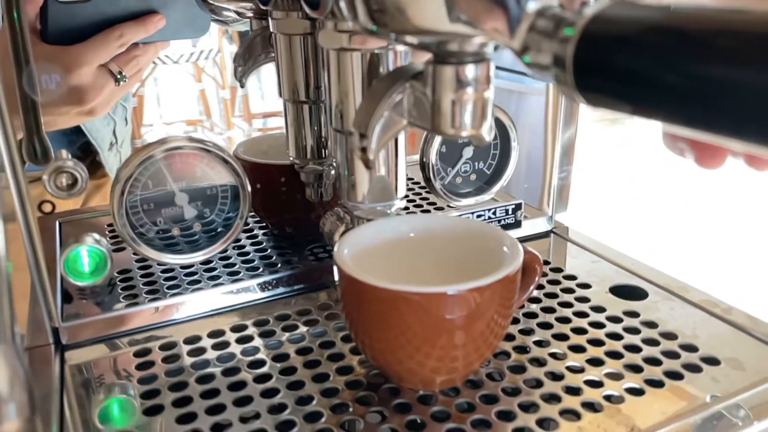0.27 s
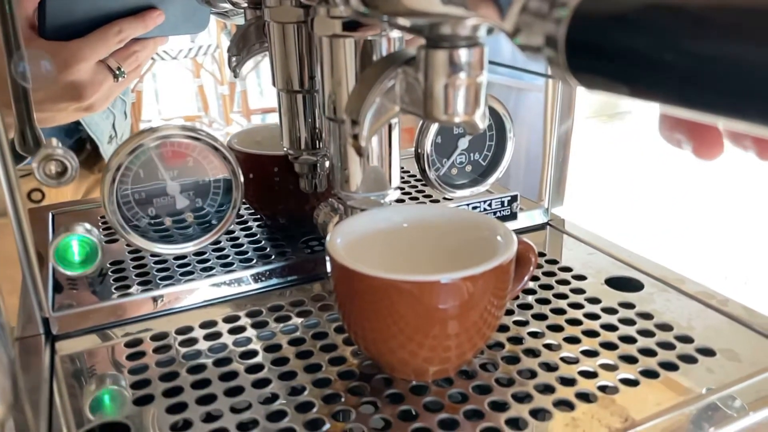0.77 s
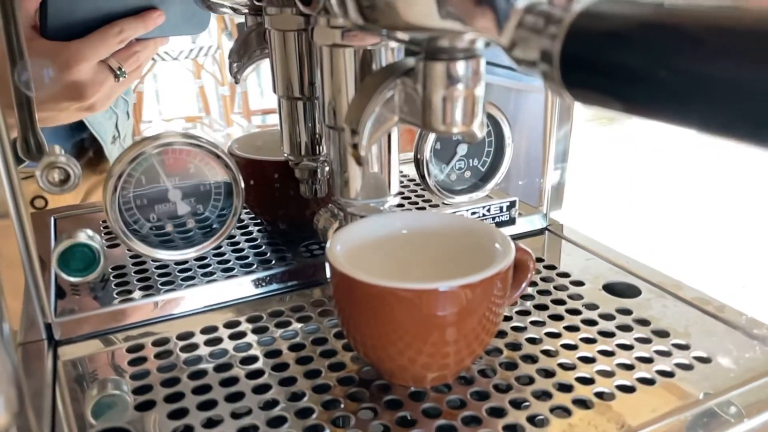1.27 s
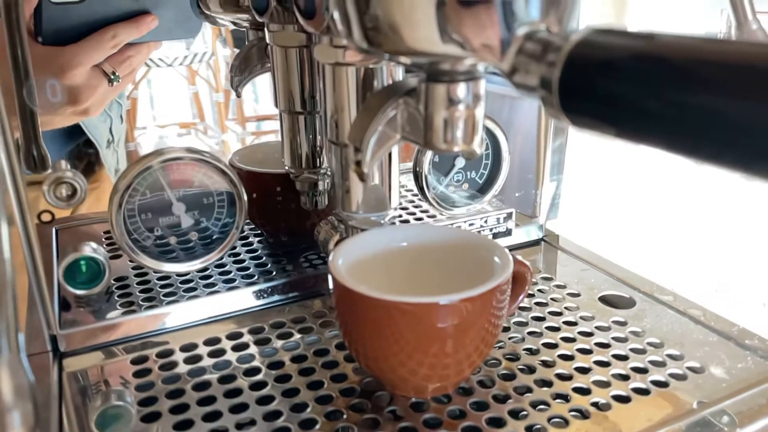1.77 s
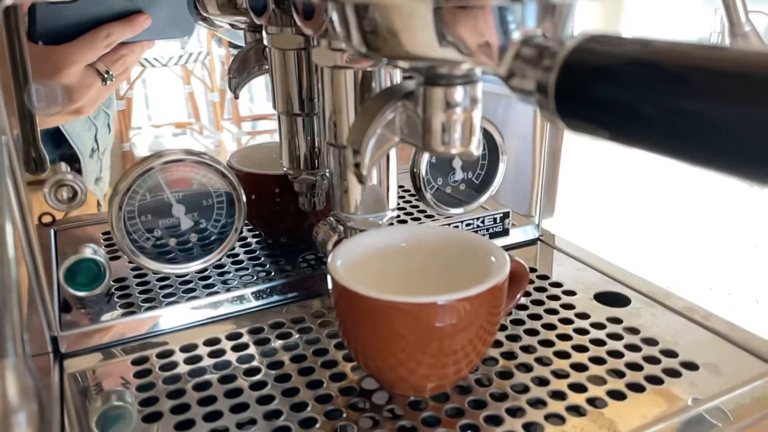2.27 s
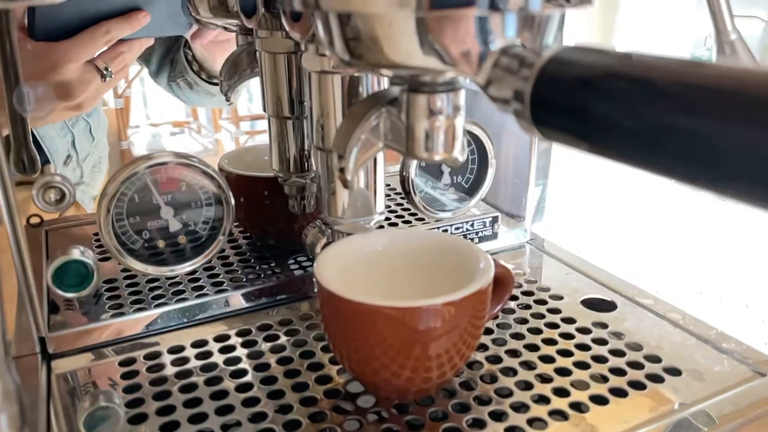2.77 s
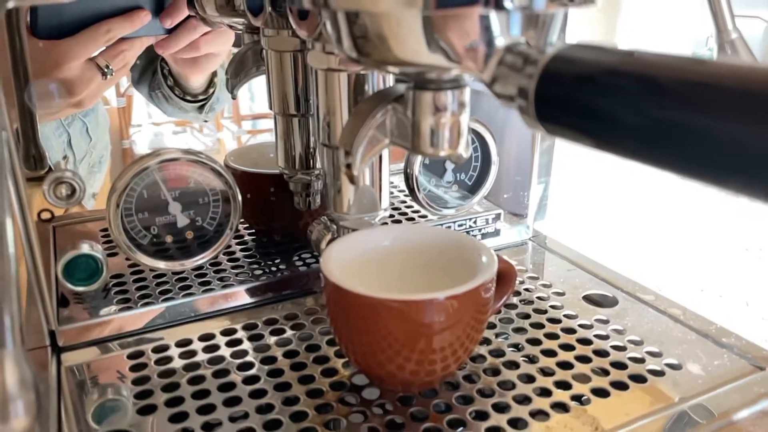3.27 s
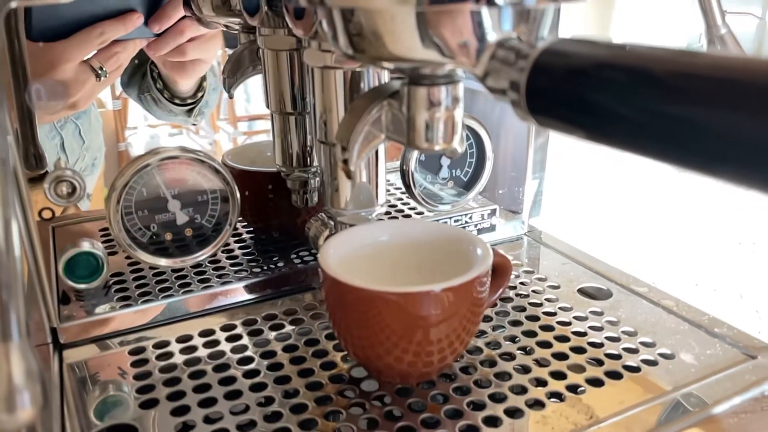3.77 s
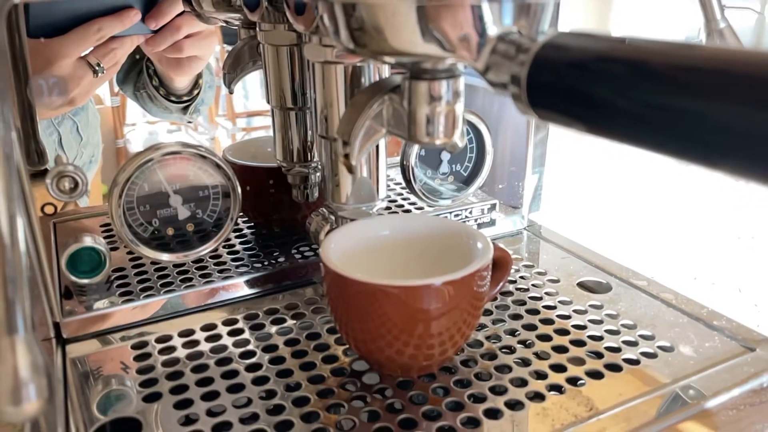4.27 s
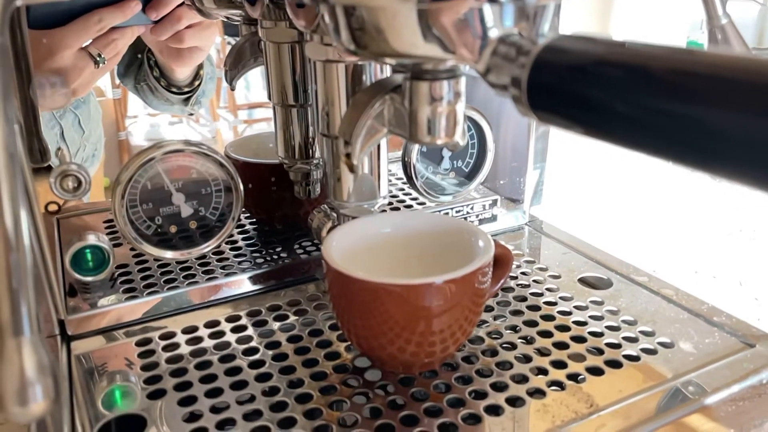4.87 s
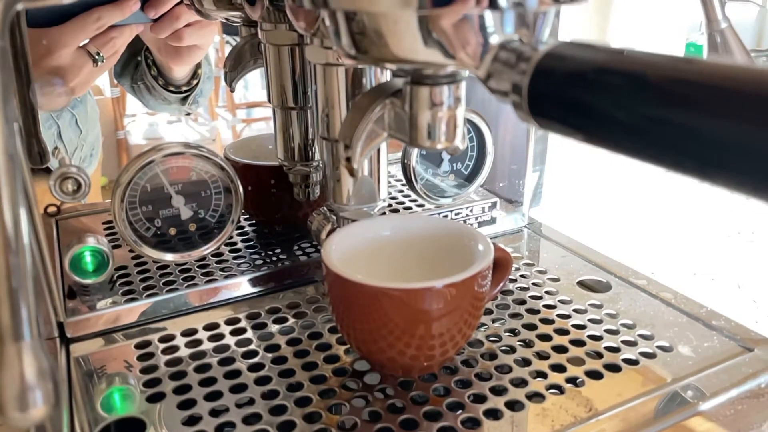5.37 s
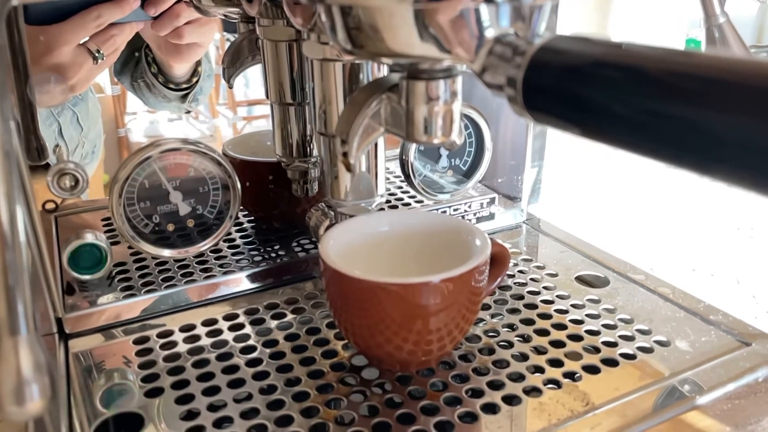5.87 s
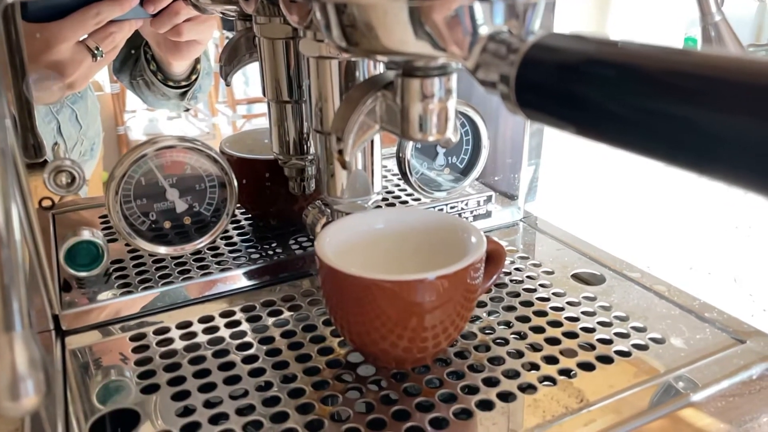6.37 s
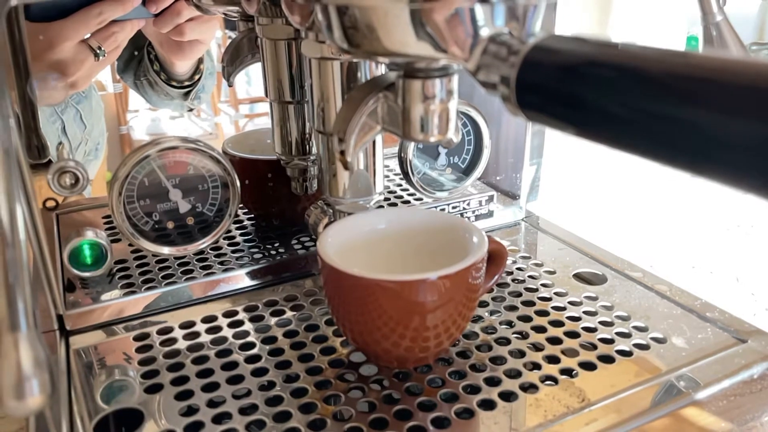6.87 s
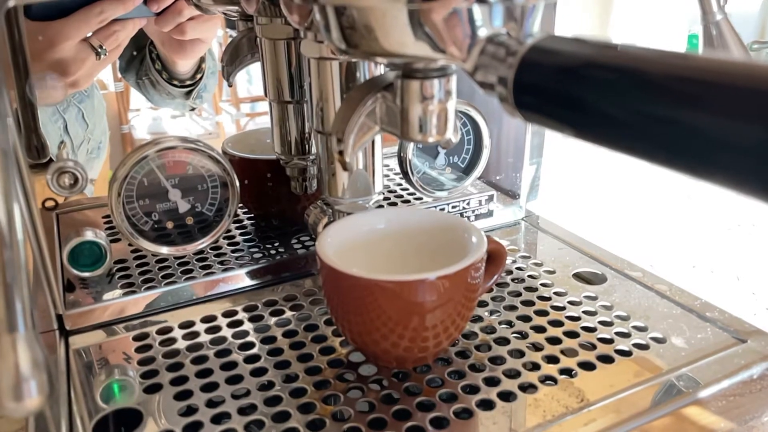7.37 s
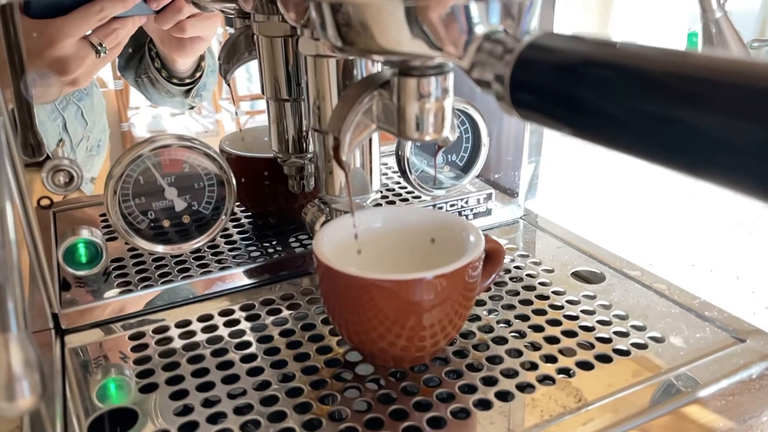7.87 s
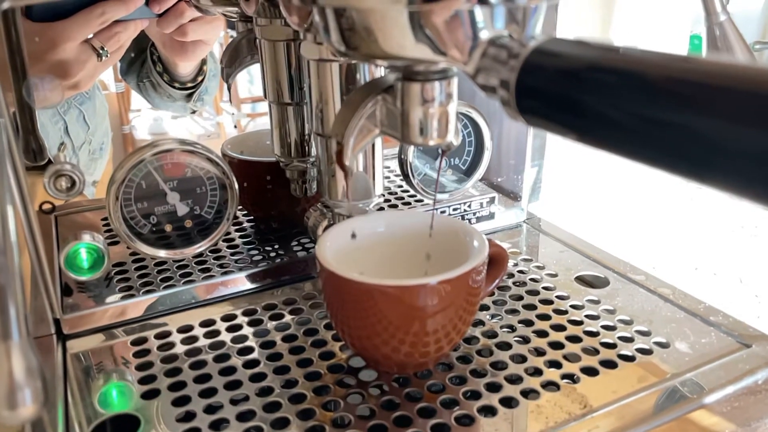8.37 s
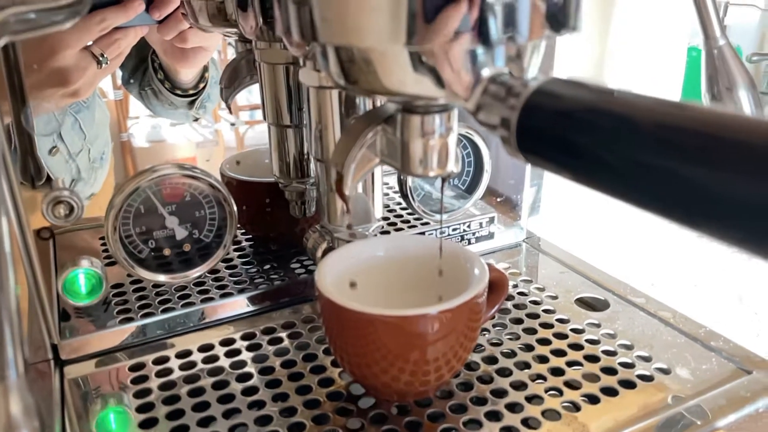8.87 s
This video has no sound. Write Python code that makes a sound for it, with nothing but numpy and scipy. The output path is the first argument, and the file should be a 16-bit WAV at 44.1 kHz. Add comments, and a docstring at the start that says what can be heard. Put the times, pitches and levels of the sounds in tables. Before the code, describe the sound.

Close stereo in a small kitchen: faint low drone and a thin simmer, then a soft lever scuff and dry metallic snap. A motor starts with a burst of gurgling, sputtering water and air, then settles to a steady mains hum with whine and soft flow hiss. A fluttering panel rattle stops late, followed by quiet hooting pulses and two tiny drops in a cup.

```python
"""An espresso machine in a kitchen: over room air and drones, a simmer sinks, the lever scuffs and trips its switch.
Contacts snap, a motor spins up and the valve opens; water and air churn through the pump as shaped noise and bubbles.
Then harmonic lines of mains hum and shaft whine settle over pulsing flow noise, and the casing flutters and rattles.
As pressure is reached the motor sags a little and the flutter stops; the bypass valve hoots and two drops of coffee
land in the cup."""
import sys
import numpy as np
from scipy import signal
from scipy.fft import rfft, irfft, next_fast_len
from scipy.io import wavfile
from scipy.ndimage import map_coordinates

SR = 44100
rng = np.random.default_rng(int(sys.argv[2]) if len(sys.argv) > 2 else 0)


def unload_audio(sound):
    """Save the sound as a 16-bit wav file, at the path given as the first command line argument."""
    columns = np.transpose(np.atleast_2d(sound))
    # keep every value between -1 and 1, then stretch to whole-number steps
    steps = np.round(np.clip(columns, -1, 1) * 32767)
    wavfile.write(sys.argv[1], SR, steps.astype(np.int16))


N = 402191
T = np.arange(N) / SR  # seconds

MAINS_HZ = 120.035  # magnetic hum
TOP_HZ = 15900  # middle of the upper band edge
SLIDE_S, SWITCH_S = 0.992, 1.2735  # the lever starts to slide, and trips the switch
START_S, PRIMED_S = 1.39, 2.03  # the motor starts, and the pump is primed
PINNED_S = 7.36  # pressure begins to pin the loose panel
# Shaft speed in air, while filling and at full pressure, and its random drift (turns per second).
FREE_HZ, FILLING_HZ, LOADED_HZ, DRIFT_HZ = 28.85, 28.51, 28.39, 0.02
SPIN_UP_S, PRIMING_S = 0.025, 0.13
HOOT_S = 0.025  # half width of one hoot

# Boiler, room air and lever friction spectra. Each row: frequency in Hz, relative level in dB.
BOILER_SPECTRUM = [(1290, -53), (2200, -4), (4500, -12), (6100, -7), (8500, -13), (12200, -1.5),
                   (15500, -12)]
KITCHEN_SPECTRUM = [(12, -61), (20, -49), (39, -24), (60, -34), (86, -8), (123, -16.5), (288, -11),
                    (325, -13), (382, -14), (517, -15), (850, -18), (1280, -23.5), (1700, -35), (2500, -41),
                    (3250, -91), (5500, -120)]
SCUFF_SPECTRUM = [(500, -15), (1300, 8), (2400, -3), (5200, -13), (8000, -22), (13000, -21), (15000, -30)]
# Faint appliance tones. Each row: frequency in Hz, mean level in dB.
APPLIANCE_TONES = [(120, -68), (218, -70), (360, -69), (518, -71)]
# Snaps of the brew switch and of the contacts. Each row: frequency in Hz, relative level in dB.
SWITCH_SPECTRUM = [(200, -16), (550, 5), (1250, 4), (1600, 2), (2150, 4.5), (2900, -5), (3500, -4),
                   (3900, -14), (4350, -13), (4900, 0), (5500, -10), (5950, -1), (6850, -1), (7800, -20),
                   (10000, -5), (13400, -2), (16000, -18)]
SNAP_SPECTRUM = [(120, -59), (200, -26), (500, -21), (899, -26), (1020, -22), (1620, -40), (1740, -41),
                 (2020, -9), (3190, -11), (4430, -13), (5100, 0.5), (5800, -11), (9400, -15), (12300, -0.5),
                 (13600, 3), (16000, -27)]
# Valve contacts. Each row: start in seconds, relative level in dB, treble lift in dB, relative knock in dB.
CONTACTS = [(1.3922, -11, 4, -30), (1.3944, -5, 5.5, -28), (1.3972, -12, 3, -14), (2.191, -26, 1, -20),
            (2.205, -28, 1, -20)]
# Low, middle and high noise of the first water. Each row: frequency in Hz, relative level in dB.
CHURN_SPECTRUM = [(94, -56), (160, -4), (206, -11), (237, -13), (297, -31), (349, -6.5), (445, -4),
                  (523, -10.5), (615, -7.5), (667, -2.5), (793, -8), (859, -9), (1000, -8), (1290, -13),
                  (1800, -16.5), (2340, -47), (3960, -120)]
GUSH_SPECTRUM = [(880, -54), (1500, -4), (2120, -2.5), (2400, -6), (5580, -12.5), (6560, -8.5), (9280, -22),
                 (9500, -32), (12400, -48), (20900, -120)]
SPRAY_SPECTRUM = [(7000, -11), (10000, 0.5), (12500, 1.5), (14800, -8.5), (16000, -25)]
# Panels shaken by water, and pipework rung by air bubbles.
# Each row: frequency in Hz, half width in Hz, relative level in dB.
PANEL_MODES = [(57.3, 32, -56), (238, 9.1, -41.5), (355, 4.9, -42), (400.4, 7.2, -43), (533, 4.3, -39),
               (893.4, 14, -39), (1286, 10, -42.5)]
TUBE_MODES = [(2170, 95, 11), (2965, 14, 3), (3480, 14, 1), (5190, 25, 0)]
# Air pockets. Each row: centre in seconds, half width in seconds, then churn, rush and spray swells in dB.
AIR_POCKETS = [(1.48, 0.022, 1.5, 5.5, 1.5), (1.69, 0.03, 4.5, -0.5, 1.5), (1.95, 0.095, 5.5, 2.5, -0.5),
               (2.005, 0.05, 0.5, 2, 8), (2.05, 0.028, 0, 6.5, 1), (2.125, 0.012, 1, -2, 8)]
# Gulps of water that swell the hum. Each row: centre in seconds, half width in seconds, swell in dB.
GULP_SWELLS = [(1.51, .05, 2), (1.75, 0.12, 9.5), (2.13, 0.11, 5)]
# Magnetic buzz. Each row: multiple of the hum, level while filling in dB, level while coffee flows in dB,
# left-right difference in dB. The hum itself uses only its flowing level.
BUZZ_LINES = [(1, -32, -32, 1), (2, -45, -46, 13), (3, -65, -68, 1), (4, -57, -61, -3), (5, -68, -66, 4),
              (6, -56, -55, 9), (7, -58, -55, 10), (8, -68, -62, 1), (9, -57, -57, 10), (10, -59, -59, 2),
              (11, -68, -65, -2), (12, -65, -68, 0), (13, -60, -63, 3), (15, -61, -60, -1),
              (17, -65, -65, -5), (18, -71, -60, -5), (19, -68, -70, -2), (20, -67, -71, -10),
              (21, -59.5, -63, -4), (22, -72, -60, -5), (24, -68, -63, -2), (25, -65, -58, -1),
              (32, -66, -62, 3), (33, -75, -68, -4), (34, -77, -70, 1), (35, -78, -72, 6)]
# Overtones of the buzz that swell or sink for a while.
# Each row: multiple of the hum, start in seconds, stop in seconds, change in dB.
OVERTONE_SWELLS = [(4, 2.0, 2.85, 4), (22, 2.3, 2.85, 11), (21, 7.38, 8.02, -9), (22, 7.3, 8.3, -6),
                   (18, 7.2, 7.36, 9), (18, 7.45, 8.3, -6), (18, 8.45, 8.76, 4), (24, 7.4, 8.02, -5),
                   (32, 7.42, 8.02, -8)]
# Pump whine. Each row: shaft order, relative level while filling in dB, relative level while coffee flows in dB,
# left-right difference in dB.
WHINE_LINES = [(4, -57, -58, 2), (19, -65, -65, 9), (20, -64, -60, 6), (26, -63, -64, -4),
               (28, -66, -62, 8), (30, -50, -49, 7), (33, -69, -65, 0), (34, -52.5, -53, 2),
               (35, -67, -65, 12), (36, -65, -64, 10), (43, -63, -60, 1), (44, -66, -65, 3),
               (45, -65, -65, 8), (52, -64, -61, -1), (53, -66, -70, 0), (54, -66, -68, 0)]
# Rotor slots beating with the field. Each row: shaft order, multiple of the hum added to it,
# relative level while filling in dB, relative level while coffee flows in dB.
SLOT_LINES = [(34, 1, -64, -62), (34, 2, -57, -64), (39, 1, -63, -57)]
# Flow noise of pump body, pipes and jet. Each row: frequency in Hz, relative level in dB.
BODY_SPECTRUM = [(25, -31), (85, -8), (150, -10), (290, -17.5), (400, -12.5), (750, -10.5), (1100, -13.5),
                 (1250, -7), (1420, -17.5), (2500, -19.5), (3300, -23), (4500, -55)]
PIPE_SPECTRUM = [(2000, -14), (3100, -0.5), (3900, 4), (4550, -6.5), (5220, -0.5), (5730, -9.5),
                 (6300, 1.5), (7000, -2.5), (7600, -12), (9500, -17.5), (12000, -44)]
JET_SPECTRUM = [(7000, -6), (10000, -2), (12000, -0.5), (14600, -7), (16000, -53)]
# Swells of the jet's hiss. Each row: centre in seconds, half width in seconds, swell in dB.
HISS_SWELLS = [(5.02, 0.33, 4.5), (6.1, 0.49, 1.8)]
# Casing flutter. Each row: time in seconds, frequency in Hz.
FLUTTER_TRACK = [(2, 142), (2.3, 140.6), (5.2, 140.8), (6.9, 142.8), (7.12, 152.8), (7.7, 154)]
# Side tones of the flutter. Each row: multiples of the hum above it, mean level in dB.
RATTLE_LINES = [(1, -64), (2, -62), (5, -65), (7, -66), (8, -68), (14, -69), (20, -63), (26, -72),
                (27, -70), (29, -65), (32, -62)]
# Vane overtones. Each row: shaft order, level while filling in dB, level while coffee flows in dB.
VANE_LINES = [(76, -69, -80), (78, -80, -68), (80, -69, -80), (96, -67, -75), (104, -66, -67),
              (105, -67, -72), (112, -69, -67), (132, -72, -80), (140, -63, -78), (148, -66, -69),
              (152, -71, -69), (184, -73, -77), (243, -69, -72)]
# Pressure build-up. Each row: time in seconds, share of full pressure.
PRESSURE_TRACK = [(7.05, 0.0046), (7.5, 0.99)]
# Hoots of the bypass valve. Each row: centre in seconds, level in dB.
HOOT_PULSES = [(7.52, -53), (7.63, -48), (8.16, -50), (8.3, -49), (8.46, -48), (8.6, -51), (8.75, -52),
               (8.95, -61), (9.08, -55)]
# Drops landing in the cup. Each row: start in seconds, level in dB, pitch in Hz.
CUP_DROPS = [(8.1745, -32, 1200), (8.668, -43, 3700)]
# Phase between the ears, for tones and for noise. Each row: frequency in Hz, lead of the left side in radians.
TONE_LEAD = [(55, .1), (120, 1.4), (141, 0), (240, .8), (480, 2), (570, .6), (720, 1), (855, 1.4),
             (969, 2.7), (1080, 4.2), (1210, 2), (1560, 3.5), (1800, 3.9), (2040, 4.5), (2160, 5.7),
             (2520, 7), (3000, 7.7), (3600, 7.7), (3840, 10), (4000, 8.1)]
NOISE_PHASE = [(0, 0), (7000, 18.8), (8300, 15.9), (10000, 15.2), (12700, 12.57)]
# Likeness of the two sides of noise. Each row: frequency in Hz, coherence from 0 to 1.
COHERENCE = [(60, 0.53), (200, 1), (600, 0.69), (1400, 0.12), (4500, 0.14), (5900, 0.55), (7000, 0.16),
             (7700, 0.046), (9300, 1), (11500, 0.29), (13000, 1)]
# Tilt of noise between the sides. Each row: frequency in Hz, left-right difference in dB.
SIDE_BALANCE = [(60, 7), (200, -2), (380, 1.5), (700, 5.5), (1300, 4), (2400, 0.5), (4400, 5), (9000, 0)]
# Kitchen echo. Each row: frequency in Hz, time to fall by 60 dB in seconds.
ROOM_DECAY = [(200, 0.065), (3000, 0.47), (13000, 0.11)]


def amp(db):
    """Logarithmic level: decibels to gain."""
    return np.exp(np.asarray(db, np.float32) * np.float32(np.log(10) / 20))


def unit(x):
    """Normalization to rms 1."""
    return x / np.sqrt(np.mean(x ** 2) + 1e-20)


def along(points, hz):
    """Interpolation of (Hz, value) points on a logarithmic frequency axis."""
    f, v = np.transpose(points)
    return np.interp(np.log(hz + 1), np.log(f + 1), v)


def curves(rows):
    """Linear interpolation in time: one curve for each column after the seconds."""
    s, *columns = np.transpose(rows)
    return [np.interp(T, s, column) for column in columns]


def wobble(rate):
    """Slow random modulation: a smooth curve through rate random knots a second."""
    coarse = T[::64]
    knots = rng.standard_normal(1024)
    return np.interp(T, coarse, map_coordinates(knots, [coarse * rate], mode="wrap"))


def ramp(start, length):
    """Linear onset from 0 to 1 over length seconds."""
    return np.clip((T - start) / length, 0, 1)


def held(start, attack, stop, fall_db_per_s):
    """Exponential decay: a linear rise multiplied by a steady dB fall that begins at stop."""
    return ramp(start, attack) * amp(-fall_db_per_s * np.clip(T - stop, 0, None))


def swells(rows):
    """Gaussian swells (centre s, half width s, dB, ..): one dB curve for each level column."""
    rows = np.array(rows)
    bells = np.exp(-np.minimum(((T - rows[:, :1]) / rows[:, 1:2]) ** 2, 20))
    return rows[:, 2:].T @ bells


def filtered(x, response):
    """Linear filtering: the spectrum of x times a response of frequency."""
    m = next_fast_len(N + 8192)
    return irfft(rfft(x, m) * response(np.fft.rfftfreq(m, 1 / SR)), m)[..., :N]


def noise(gain):
    """Partly coherent stereo noise of rms 1, with level and phase differences between the sides."""
    m = next_fast_len(N, True)
    hz = np.fft.rfftfreq(m, 1 / SR)
    turn = np.arccos(np.float32(np.clip(along(COHERENCE, hz), 0, 1))) / 2
    white = rng.standard_normal((2, 2 * len(hz)), np.float32).view(np.complex64)
    mid, side = white * np.float32(gain(hz)) * np.array([np.cos(turn), np.sin(turn)])
    lead = np.float32(np.interp(hz, *np.transpose(NOISE_PHASE)) / 2)
    lean = amp(along(SIDE_BALANCE, hz) / 2) * (np.cos(lead) + 1j * np.sin(lead))
    sides = np.array([(mid + side) * lean, (mid - side) / lean])
    return unit(irfft(sides, m, norm="ortho")[:, :N])


def hiss(spectrum):
    """Broadband turbulence or friction: noise shaped by a spectrum."""
    return noise(lambda hz: amp(along(spectrum, hz)))


def resonant(modes):
    """Resonance: noise concentrated in bands of given centre and half width."""
    def response(hz):
        return sum(amp(db) / np.sqrt(w) / (1 + ((hz - centre) / w) ** 2) for centre, w, db in modes)
    return noise(response)


def angle(hz):
    """Phase as the running integral of frequency."""
    return 2 * np.pi * np.cumsum(hz) / SR


def steady(hz):
    """Uniform rotation: the phase of a constant frequency."""
    return 2 * np.pi * hz * T


def tone(phase, hz, pan_db=0):
    """A pure tone of rms 1 with level and phase differences between the sides; hz selects the phase lead."""
    gains = amp(np.array([[pan_db], [-pan_db]]) / 2)
    offsets = rng.uniform(0, 2 * np.pi) + np.array([[along(TONE_LEAD, hz)], [0]])
    wrapped = phase - 2 * np.pi * np.floor(phase / (2 * np.pi))
    return np.float32(np.sqrt(2) * unit(gains)) * np.sin(np.float32(wrapped) + np.float32(offsets))


def echo(x):
    """Reverberation: convolution with decaying noise, each frequency dying at its own speed."""
    hz, t, z = signal.stft(rng.standard_normal((2, SR // 2)), SR, nperseg=256)
    decay = amp(-60 * t / along(ROOM_DECAY, hz)[:, None])
    tail = signal.istft(z * decay, SR, nperseg=256)[1]
    return signal.fftconvolve(x, tail / np.linalg.norm(tail[0]), axes=1)[:, :N]


def kitchen(air_db=-60, fridge_db=-64, compressor_db=-67, simmer_db=-74, calming_db=11, whistle_db=-79):
    """Beating of two close drones, with room air, faint tones, a simmer that sinks and a thin whistle that ends."""
    beating = amp(fridge_db) * tone(steady(59.2), 59) + amp(compressor_db) * tone(steady(55), 55)
    faint = sum(amp(db + 1.1 * wobble(9.2)) * tone(steady(hz), hz) for hz, db in APPLIANCE_TONES)
    simmer = amp(simmer_db - calming_db * ramp(0.54, 0.33)) * hiss(BOILER_SPECTRUM)
    whistle = amp(whistle_db) * (1 - ramp(0.8, 0.3)) * resonant([(2780, 240, 0)])
    return amp(air_db) * hiss(KITCHEN_SPECTRUM) + beating + faint + simmer + whistle


def lever(scuff_db=-57, scuff_fall_db_per_s=300, rub_db=-70):
    """Sliding friction: a soft scuff as the lever starts, then a faint rub that grows until it meets the switch."""
    scuff = amp(scuff_db) * held(SLIDE_S, 0.0042, SLIDE_S, scuff_fall_db_per_s)
    rub = amp(rub_db) * held(1.09, 0.21, SWITCH_S, scuff_fall_db_per_s)
    return (scuff + rub) * hiss(SCUFF_SPECTRUM)


def switch(switch_db=-35.5, crack_t60=0.022, tail_db=-12, tail_t60=0.16):
    """Impact with two decay times: the brew switch gives a full, dry snap and a short ring."""
    age = np.clip(T - SWITCH_S, 0, 1)
    decay = amp(-60 * age / crack_t60) + amp(tail_db - 60 * age / tail_t60)
    return amp(switch_db) * ramp(SWITCH_S, 0.00071) * decay * hiss(SWITCH_SPECTRUM)


def wandering(x, drift, drift_per_s):
    """Frequency modulation by a drifting clock: pitch varies by a small share."""
    clock = T + drift * np.cumsum(wobble(drift_per_s)) / SR
    return np.array([np.interp(clock, T, side) for side in x])


def gurgle(bubble_hz=560, pitch_spread=0.38, life_cycles=7, rise=0.12, size_db=2.0, count=70):
    """Bubble resonance: air bubbles of many sizes ring and rise in pitch as the pump swallows them."""
    out, age = np.zeros(N), T[:SR // 10]
    starts = rng.uniform(START_S, PRIMED_S + 0.1, count)
    for s, (pitch, size) in zip(starts, rng.standard_normal((count, 2))):
        cycles = bubble_hz * np.exp(pitch_spread * pitch) * age
        life = cycles / life_cycles
        envelope = amp(size_db * size) * life * np.exp(1 - 2 * life)
        ring = np.sin(2 * np.pi * cycles * (1 + rise * life / 2))
        out[round(s * SR):][:len(age)] += envelope * ring
    return out


def first_water(churn_db=-37, rush_db=-41.0, spray_db=-41, panel_db=-34.5, tube_db=-43.0, sputter_db=1.0,
                surge_db=1.0, churn_growth_db=2, gurgle_db=-37):
    """Two-phase flow: water and air churn, ring panels and pipework and spray; the lows begin to fade first."""
    churn, rush, spray = amp(swells(AIR_POCKETS))
    churn *= held(1.403, 0.15, 1.96, fall_db_per_s=52)
    churn *= amp(churn_growth_db * (ramp(1.26, 0.3) - 2.0))
    rush *= held(1.37, 0.18, 1.99, fall_db_per_s=33)
    spray *= held(1.41, 0.042, 2.113, fall_db_per_s=121)
    sputter = unit(amp(sputter_db * wobble(100)))
    surge = unit(amp(surge_db * wobble(32.45)))
    panels = wandering(resonant(PANEL_MODES), drift=0.02474, drift_per_s=20)
    tubes = wandering(resonant(TUBE_MODES), drift=0.007, drift_per_s=25)
    low = amp(churn_db) * hiss(CHURN_SPECTRUM) + amp(panel_db) * panels + amp(gurgle_db) * gurgle()
    middle = amp(rush_db) * hiss(GUSH_SPECTRUM) + amp(tube_db) * tubes
    high = amp(spray_db) * hiss(SPRAY_SPECTRUM)
    return sputter * (churn * surge * low + rush * middle + spray * high)


def clicks(ring_db=-16, click_db=-9, knock_db=-7, knock_t60=0.2, thud_db=-47):
    """Impact excitation: each contact snaps, rings and knocks the casing; a faint 54 Hz tone swells with the valve."""
    out = np.zeros((2, N))
    snap, knock = hiss(SNAP_SPECTRUM), resonant([(615, 730, 12), (2060, 390, -6)])
    dull = filtered(snap, lambda hz: 1 / (1 + (hz / 9000) ** 8))
    age = T[:SR // 2]
    attack = 1 - np.exp(-age / 0.0003)
    crack, ring = amp(-60 * age / 0.018), amp(-60 * age / 0.13)
    for s, db, lift_db, case_db in CONTACTS:
        first = round(s * SR)
        span = slice(first, first + len(age))
        bright = dull + amp(lift_db) * (snap - dull)
        steel = (crack + amp(ring_db) * ring) * unit(bright[:, span])
        case = amp(knock_db + case_db - 60 * age / knock_t60) * knock[:, span]
        out[:, span] += amp(db + click_db) * attack * (steel + case)
    # the frame tone stays faintly present before and after its swell
    jolt = np.interp(T, [1.39, 1.41, 1.5, 1.62], [0.063, 1.0, 1, 0.13])
    return out + amp(thud_db) * jolt * tone(steady(54), 54)


def pressure():
    """Pressure build-up: the share of full brewing pressure."""
    return np.clip(curves(PRESSURE_TRACK)[0], 0, 1)


def shaft_speed():
    """Motor slip under load: free spin-up, slowing as water fills the pump and again under full pressure."""
    spin = 1 - np.exp(-np.clip(T - START_S, 0, 1) / SPIN_UP_S)
    slip = (FREE_HZ - FILLING_HZ) * ramp(PRIMED_S, PRIMING_S) + (FILLING_HZ - LOADED_HZ) * pressure()
    return spin * (FREE_HZ - slip + DRIFT_HZ * wobble(3))


def rotor_angle(speed, jitter_turns=0.00094, jitter_per_s=45):
    """Phase jitter: slightly uneven rotation roughens high orders most."""
    return angle(speed) + 2 * np.pi * jitter_turns * wobble(jitter_per_s)


def singing(multiple, edge_s=0.08):
    """Amplitude modulation: dB by which one overtone of the buzz swells or sinks for a while."""
    return sum(db * (ramp(start, edge_s) - ramp(stop, edge_s))
               for k, start, stop, db in OVERTONE_SWELLS if k == multiple)


def motor(speed, waver_db=1.9, whine_waver_db=0.3, whine_db=0.3, strain_db=0.5, overtone_db=2.0,
          slack=0.23, slack_s=0.11, overtone_share=0.52):
    """Harmonic series of magnetic hum and shaft whine; their balance shifts as full pressure is met."""
    load = pressure()
    shaft, field = angle(speed), steady(MAINS_HZ)

    def level(filling, flowing, waver):
        return amp(filling + (flowing - filling) * ramp(PINNED_S, 0.13) + waver * wobble(5))

    # the hum swells with the gulps of water, then holds steady
    _, _, steady_db, hum_pan = BUZZ_LINES[0]
    strain = 1 - ramp(2.84, 0.86)
    gulp = swells(GULP_SWELLS)[0]
    gulp = gulp - slack * np.interp(T - slack_s, T, gulp)  # the load slackens after each gulp
    hum_level = amp(steady_db + gulp + strain_db * strain * ramp(PRIMED_S, 0.35))
    hum = hum_level * tone(field, MAINS_HZ, hum_pan)
    k, a, b, pan = BUZZ_LINES[1]
    overtone_level = amp(a + (b - a) * load + overtone_db * strain + overtone_share * gulp)
    hum += overtone_level * tone(2 * field, 2 * MAINS_HZ, pan)
    # the low overtones stand firm, the high ones waver more
    buzz = 0
    for k, a, b, pan in BUZZ_LINES[2:]:
        waver = waver_db * np.sqrt(k / BUZZ_LINES[-1][0])
        buzz += amp(singing(k)) * level(a, b, waver) * tone(k * field, k * MAINS_HZ, pan)
    whine = 0
    for k, a, b, pan in WHINE_LINES:
        whine += level(a, b, whine_waver_db) * tone(k * shaft, k * LOADED_HZ, pan)
    for k, m, a, b in SLOT_LINES:
        whine += level(a, b, whine_waver_db) * tone(k * shaft + m * field, k * LOADED_HZ + m * MAINS_HZ)
    return ramp(1.41, 0.093) ** 2 * (hum + buzz + amp(whine_db) * whine)


def run_up(groan_db=-37, groan_hz=345):
    """Transient panel resonance: a brief groan as the motor comes up to speed."""
    return amp(groan_db) * held(1.47, 0.036, 1.59, fall_db_per_s=150) * tone(steady(groan_hz), groan_hz)


def repeating(phase, size):
    """Periodic roughness: a random stereo profile that comes round again with every turn."""
    spot = phase / (2 * np.pi) % 1 * size
    return np.array([np.interp(spot, np.arange(size), rng.standard_normal(size)) for _ in range(2)])


def pumping(rotor, body_db=-48.5, scrape_db=-7, pipe_db=-55.5, slap_db=-4, uneven_db=1, jet_db=-58.0,
            stroke=0.046, chatter=0.14, body_drop_db=2.0, pipe_drop_db=2.0, jet_drop_db=1.5, inrush_db=6,
            settle_s=0.12, flicker_db=1.8):
    """Modulated flow noise, easing with pressure; vanes scrape every turn and slap the pipes four times a turn."""
    load, field = pressure(), steady(MAINS_HZ)
    inrush = inrush_db * np.exp(-np.clip(T - 2.2, 0, None) / settle_s)
    pulsing = unit(1 + stroke * np.cos(2 * field))
    chattering = unit(1 + chatter * np.cos(3 * field))
    turn_profile = repeating(rotor, size=1024)
    scrape = unit(filtered(turn_profile, lambda hz: amp(along(BODY_SPECTRUM, hz)) * (hz > 1150)))
    vane_profile = repeating(4 * rotor, size=384)
    slap = unit(filtered(vane_profile, lambda hz: amp(along(PIPE_SPECTRUM, hz))))
    body_level = amp(body_db - body_drop_db * load + 0.86 * wobble(4.7) + uneven_db * wobble(MAINS_HZ))
    body = body_level * (hiss(BODY_SPECTRUM) + amp(scrape_db) * scrape)
    pipe_level = chattering * amp(pipe_db + inrush - pipe_drop_db * load)
    pipes = pipe_level * (hiss(PIPE_SPECTRUM) + amp(slap_db) * slap)
    jet_level = amp(jet_db + inrush - jet_drop_db * load + swells(HISS_SWELLS)[0] + flicker_db * wobble(30))
    return ramp(1.95, 0.21) * pulsing * (body + pipes + jet_level * hiss(JET_SPECTRUM))


def filling(wash_db=-43, wash_fall_db_per_s=16, pipe_ring_db=-52, ring_stop_s=2.11, ring_fall_db_per_s=24):
    """Decaying flow and pipe resonance: the last bubbles wash out and two narrow pipes ring on."""
    wash = amp(wash_db) * held(2.03, 0.15, 1.86, wash_fall_db_per_s) * hiss(CHURN_SPECTRUM)
    ring_level = amp(pipe_ring_db) * held(1.95, 0.15, ring_stop_s, ring_fall_db_per_s)
    return wash + ring_level * resonant([(5200, 22, 0), (2150, 50, -3)])


def casing(flutter_db=-53.0, shudder_db=-44.3, throb_db=1, flicker_db=1.2, drum_db=-60):
    """Sum tones: a loose panel drums, flutters and rattles at flutter plus hum overtones, until pressure pins it."""
    flutter, field = angle(curves(FLUTTER_TRACK)[0]), steady(MAINS_HZ)
    loose = ramp(PRIMED_S, 0.59) * (1 - ramp(PINNED_S, 0.11))
    rattle = sum(amp(db + flicker_db * wobble(4.7)) * tone(flutter + k * field, (k + 1) * MAINS_HZ)
                 for k, db in RATTLE_LINES)
    drum = amp(drum_db) * resonant([(404, 17, 0)])
    # the flutter grows into a shudder just before it is pinned
    swing = held(PRIMED_S, 0.1, PINNED_S, fall_db_per_s=73)
    swing = swing * (amp(flutter_db) + amp(shudder_db) * ramp(7.0, 0.13))
    return swing * amp(throb_db * wobble(6.5)) * tone(flutter, 141, 4.6) + loose * (rattle + drum)


def vanes(rotor, waver_db=3.5):
    """Vane striking as high shaft orders: lines made slightly rough by uneven rotation."""
    load = pressure()
    lines = 0
    for k, a, b in VANE_LINES:
        lines += amp(a + (b - a) * load + waver_db * wobble(9.4)) * tone(k * rotor, k * LOADED_HZ)
    return ramp(PRIMED_S, PRIMING_S) * lines


def bypass(hoot_hz=549, waver_hz=9, whirl_db=-56, undertone_db=-47):
    """Flow-excited oscillation: the valve hoots in soft pulses over narrow noise, once also an octave lower."""
    phase = angle(hoot_hz + waver_hz * wobble(22))
    pulses = sum(amp(db) * np.exp(-np.minimum(((T - s) / HOOT_S) ** 2, 20)) for s, db in HOOT_PULSES)
    whirl = amp(whirl_db) * ramp(7.45, 0.1) * resonant([(536.5, 8.8, 0)])
    undertone_level = amp(undertone_db) * held(7.605, 0.05, 7.665, fall_db_per_s=154)
    undertone = undertone_level * tone(phase / 2, hoot_hz / 2)
    return pulses * tone(phase, hoot_hz, 10.0) + whirl + undertone


def coffee(drop_t60=0.028, bubble_db=-10, splash_width=0.13, pan_db=3):
    """Drop impact: a short resonant splash with a trace of a rising bubble, slightly to the left."""
    out = np.zeros(N)
    for s, db, hz in CUP_DROPS:
        age = np.clip(T - s, 0, 1)
        bubble = amp(bubble_db) * np.sin(2 * np.pi * hz * age * (1 + 2 * age))
        splash = unit(resonant([(hz, splash_width * hz, 0)])[0])
        envelope = amp(db - 60 * age / drop_t60) * (1 - np.exp(-age / 0.0006))
        out += envelope * (bubble + splash)
    return out * amp(np.array([[pan_db], [-pan_db]]) / 2)


def scene(wet_db=-8):
    """Superposition of all sources; the lever, switch and contacts also excite the kitchen echo."""
    speed = shaft_speed()
    rotor = rotor_angle(speed)
    hits = lever() + switch() + clicks()
    machine = motor(speed) + run_up() + casing() + vanes(rotor) + bypass()
    water = first_water() + pumping(rotor) + filling() + coffee()
    return kitchen() + hits + amp(wet_db) * echo(hits) + machine + water


def record(dry):
    """Band limiting: gain falls linearly to zero over 800 Hz around the upper edge."""
    return filtered(dry, lambda hz: np.clip((TOP_HZ - hz) / 800 + 0.5, 0, 1))


dry = scene()
out = record(dry)
unload_audio(out)
```